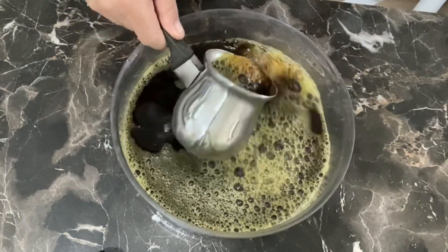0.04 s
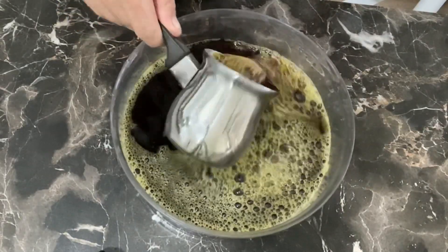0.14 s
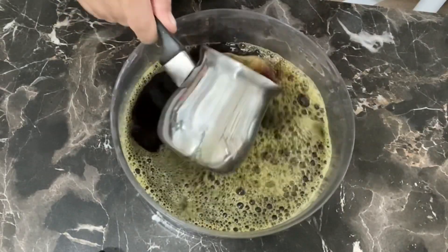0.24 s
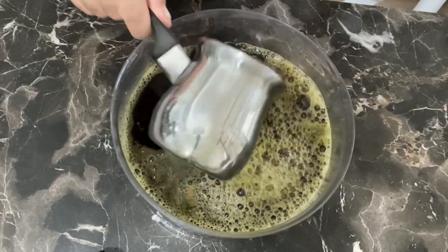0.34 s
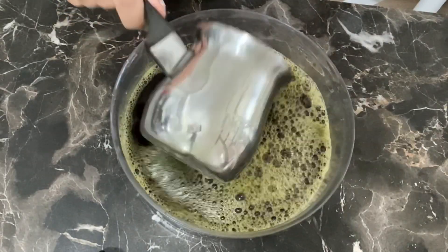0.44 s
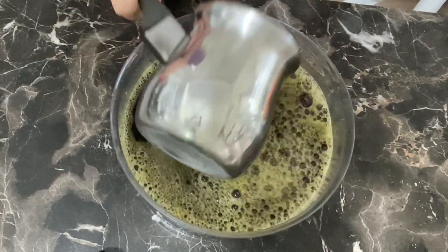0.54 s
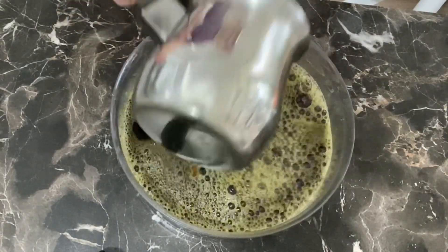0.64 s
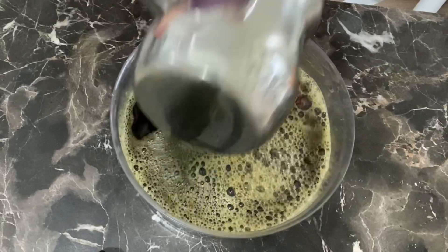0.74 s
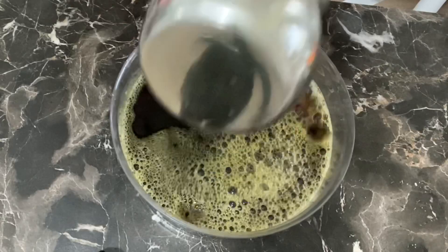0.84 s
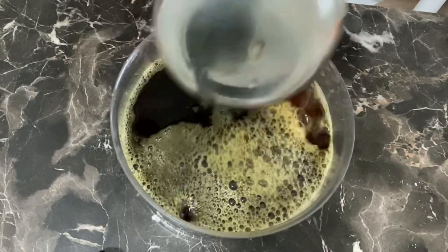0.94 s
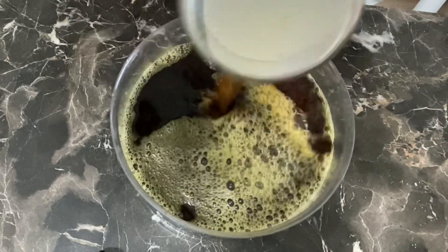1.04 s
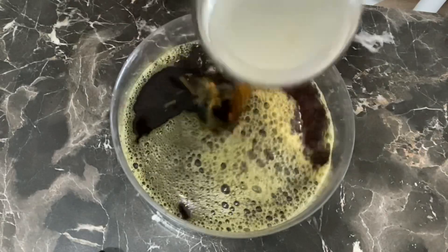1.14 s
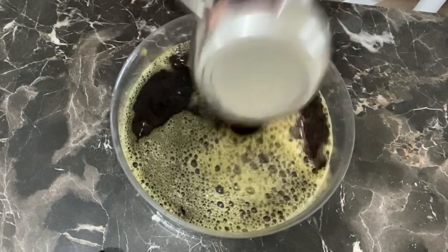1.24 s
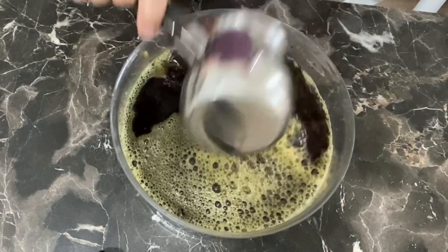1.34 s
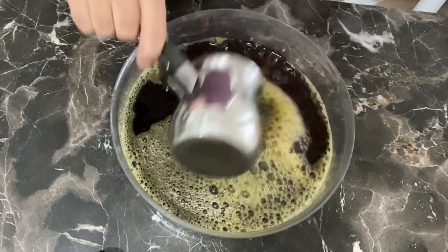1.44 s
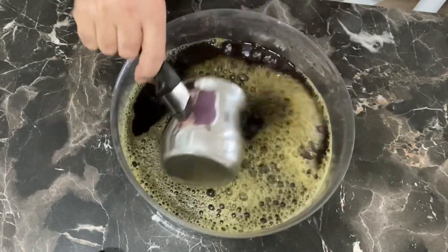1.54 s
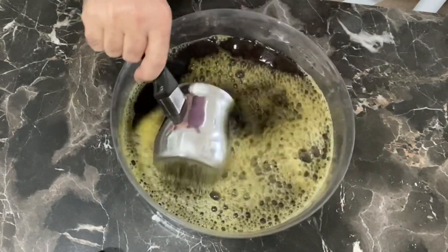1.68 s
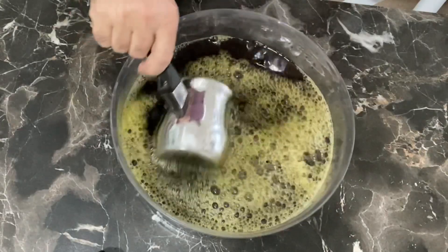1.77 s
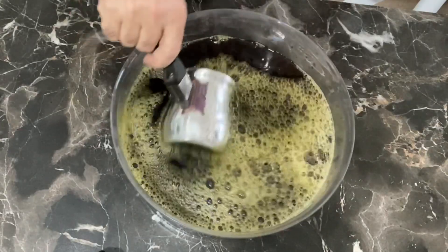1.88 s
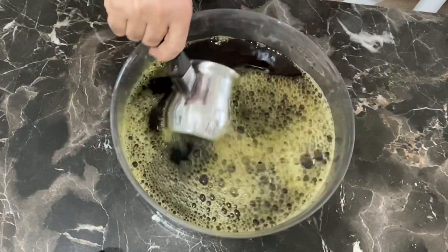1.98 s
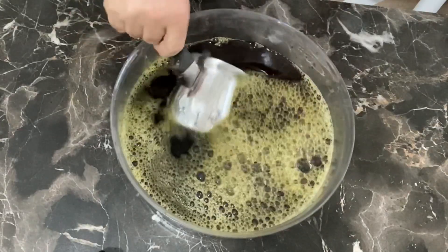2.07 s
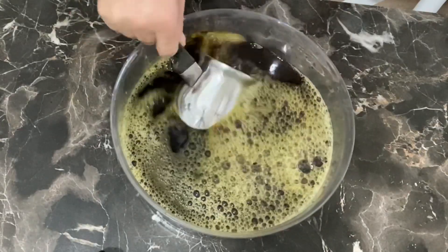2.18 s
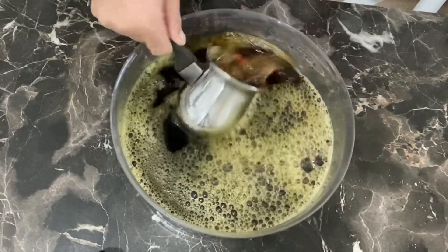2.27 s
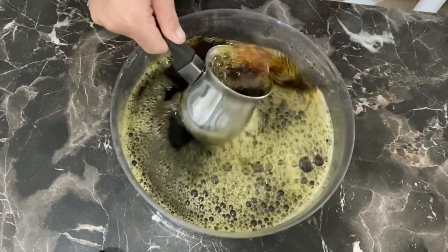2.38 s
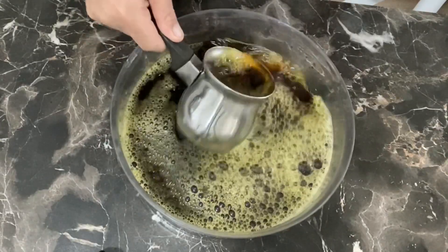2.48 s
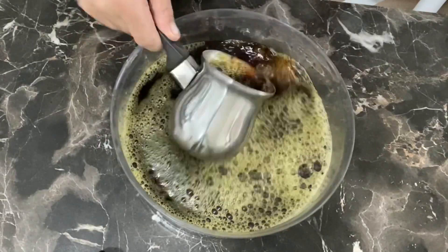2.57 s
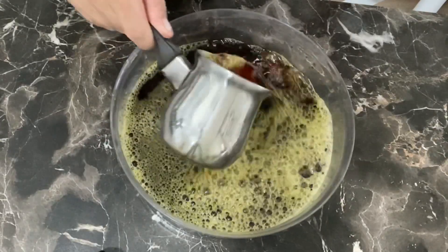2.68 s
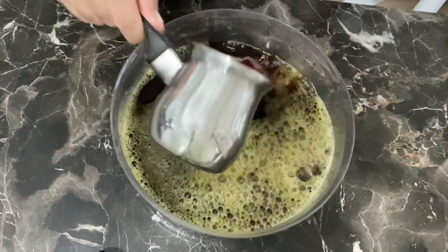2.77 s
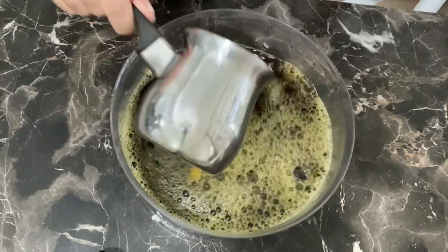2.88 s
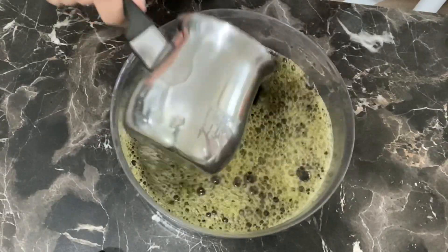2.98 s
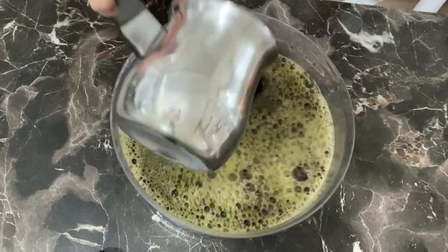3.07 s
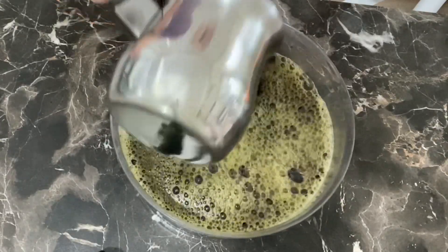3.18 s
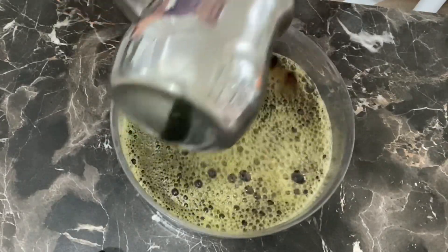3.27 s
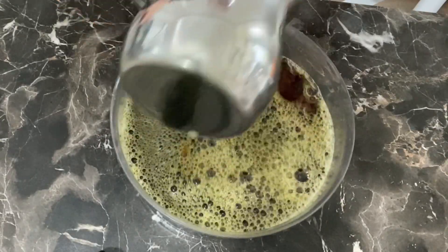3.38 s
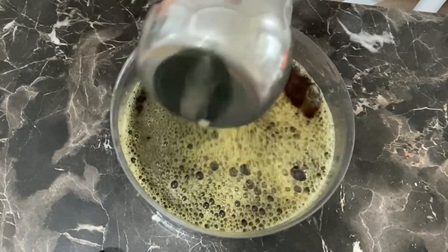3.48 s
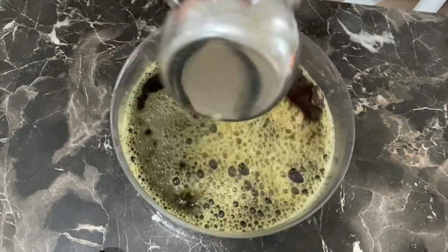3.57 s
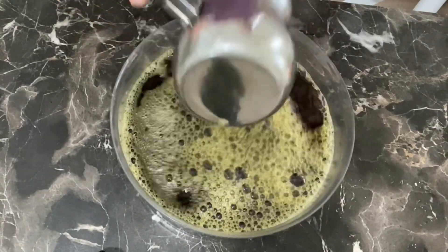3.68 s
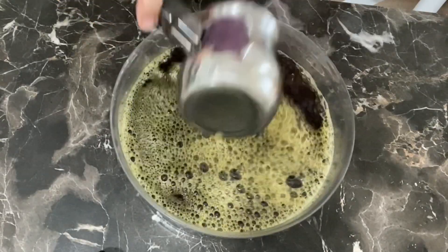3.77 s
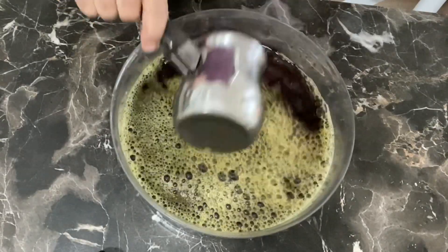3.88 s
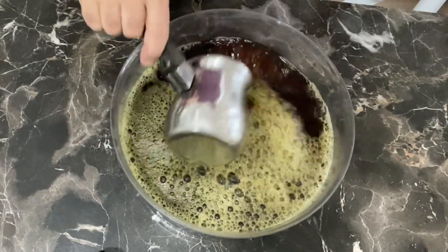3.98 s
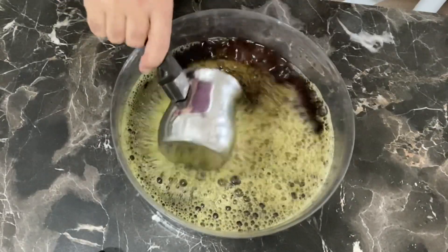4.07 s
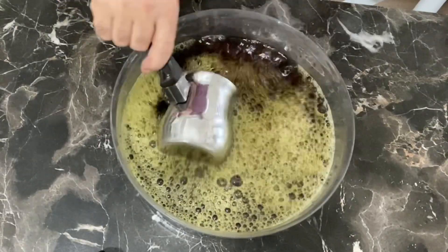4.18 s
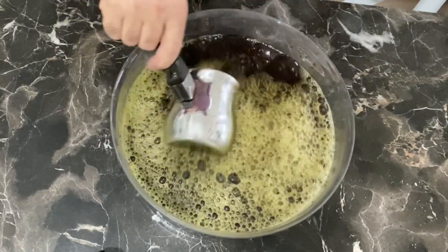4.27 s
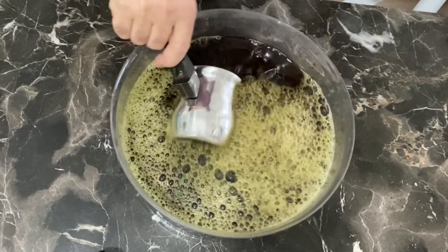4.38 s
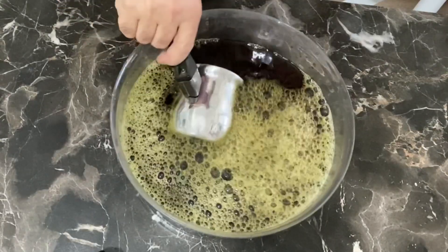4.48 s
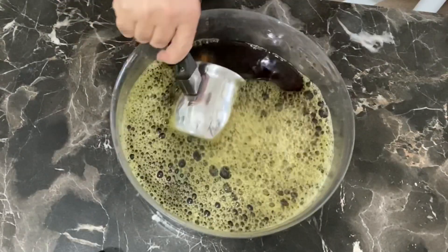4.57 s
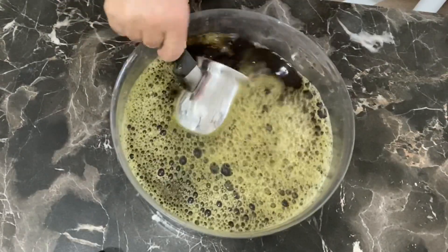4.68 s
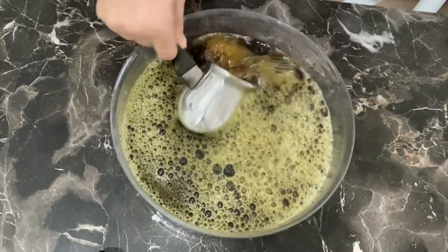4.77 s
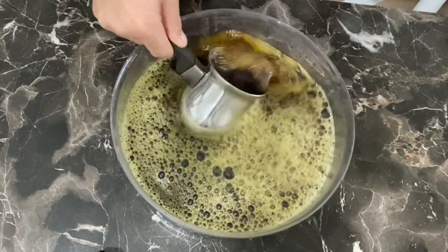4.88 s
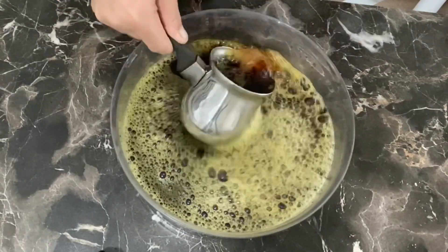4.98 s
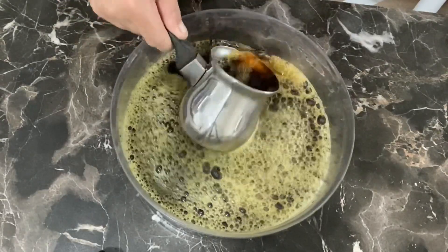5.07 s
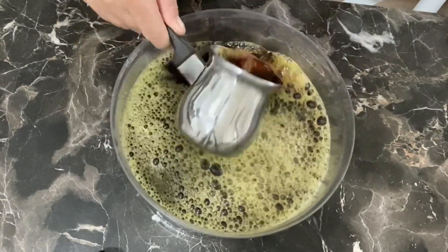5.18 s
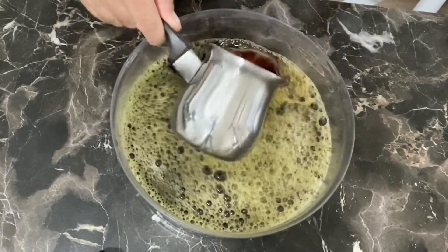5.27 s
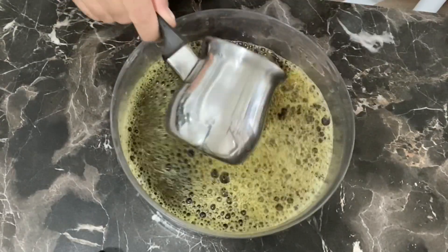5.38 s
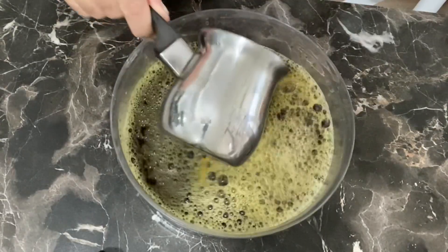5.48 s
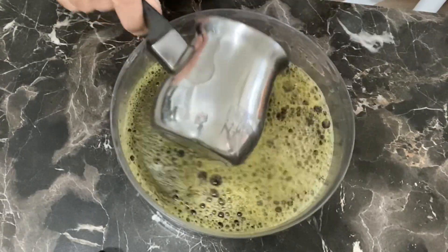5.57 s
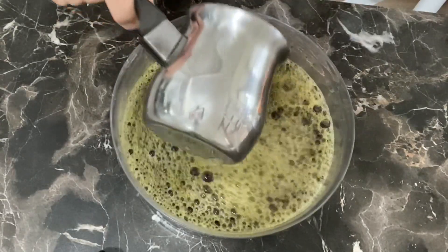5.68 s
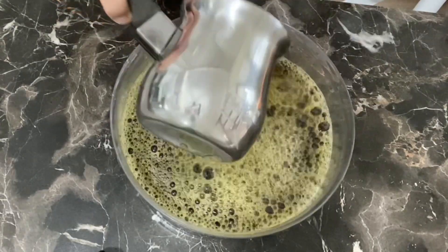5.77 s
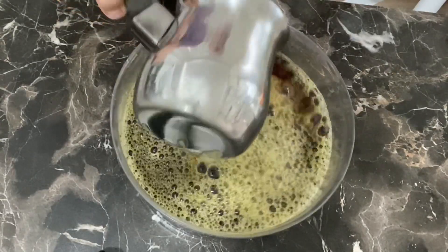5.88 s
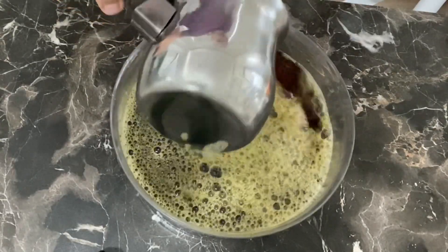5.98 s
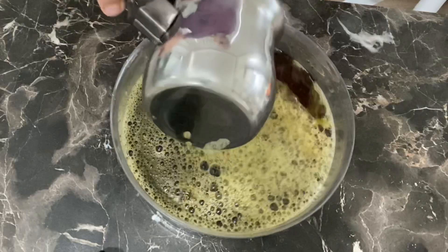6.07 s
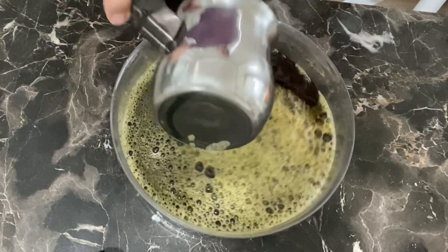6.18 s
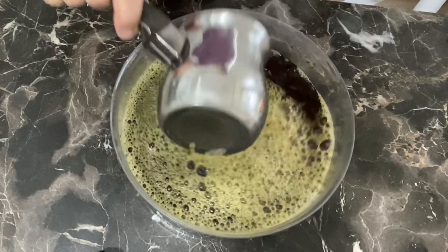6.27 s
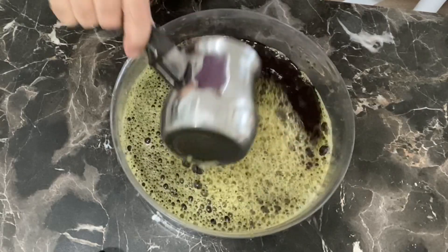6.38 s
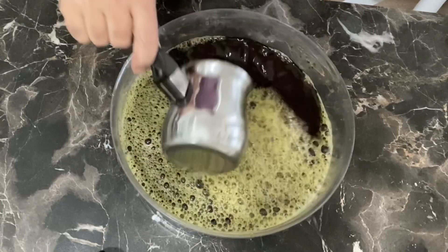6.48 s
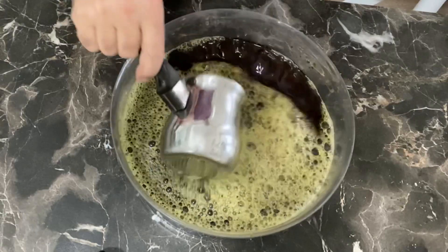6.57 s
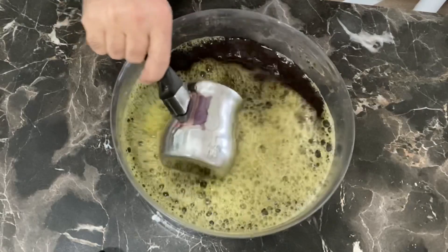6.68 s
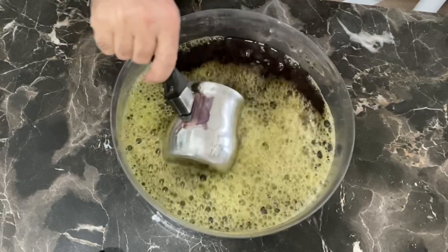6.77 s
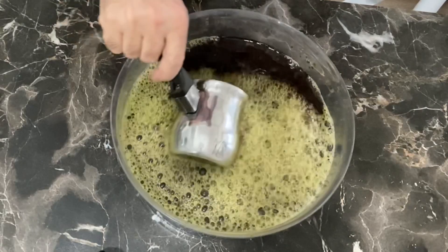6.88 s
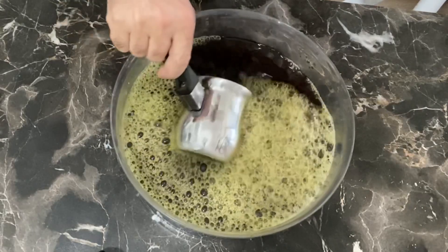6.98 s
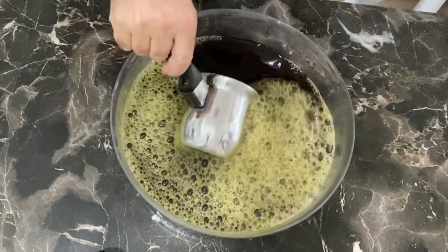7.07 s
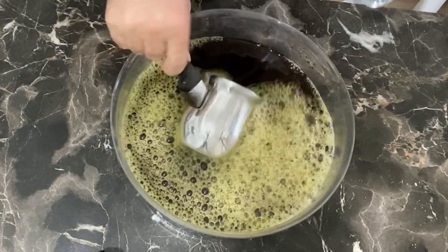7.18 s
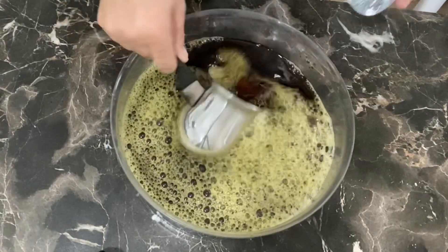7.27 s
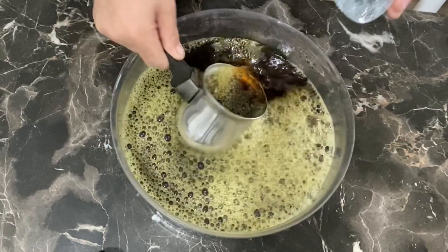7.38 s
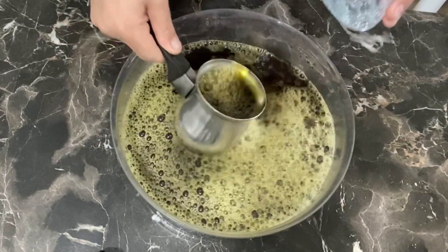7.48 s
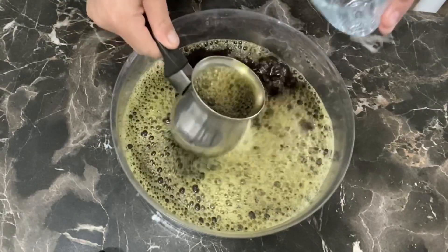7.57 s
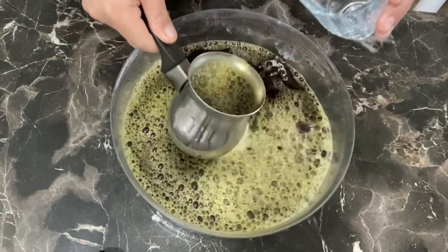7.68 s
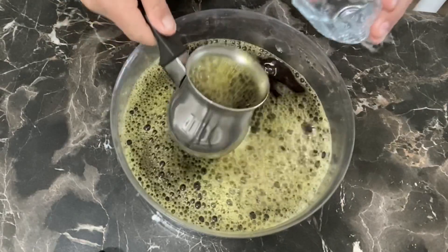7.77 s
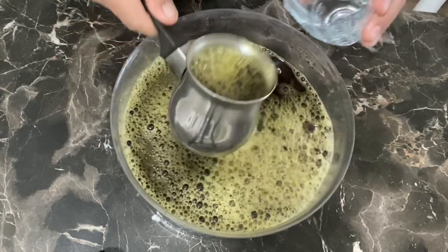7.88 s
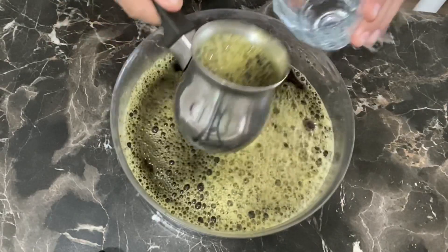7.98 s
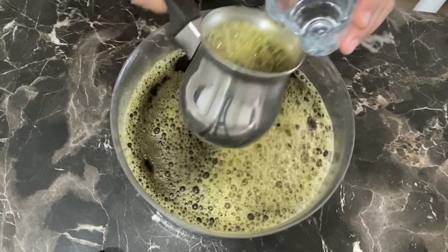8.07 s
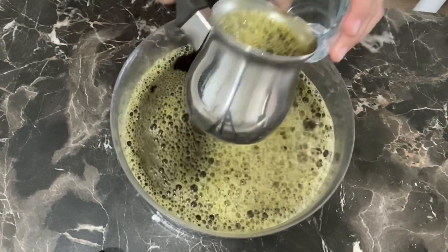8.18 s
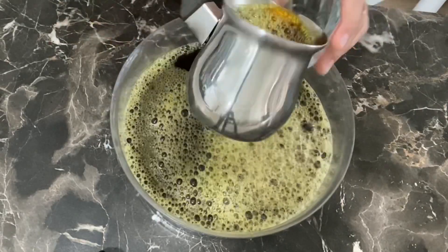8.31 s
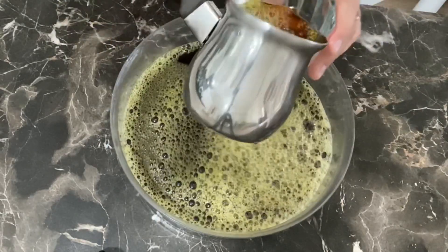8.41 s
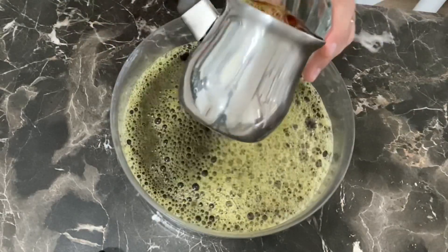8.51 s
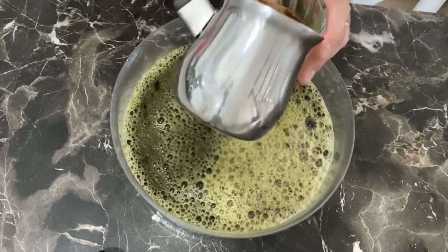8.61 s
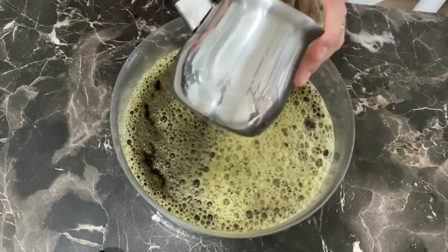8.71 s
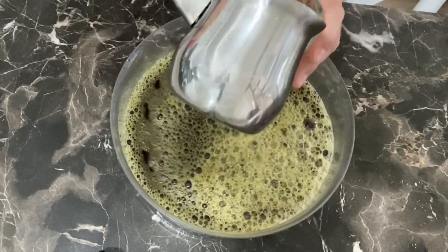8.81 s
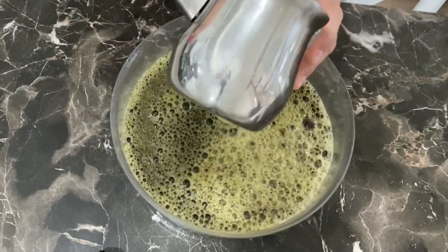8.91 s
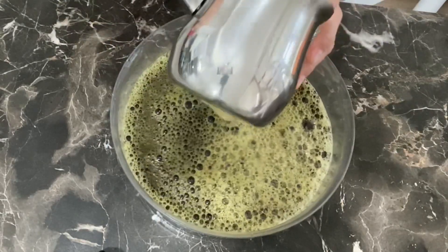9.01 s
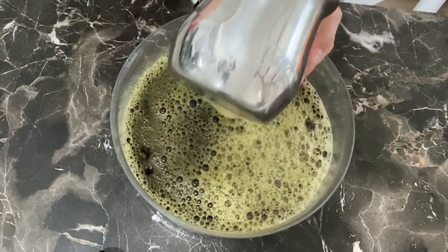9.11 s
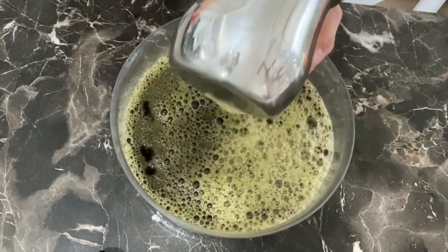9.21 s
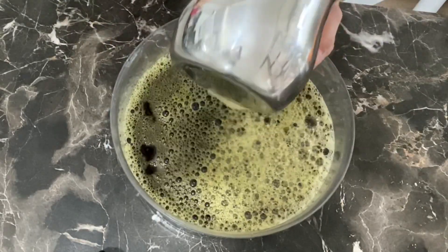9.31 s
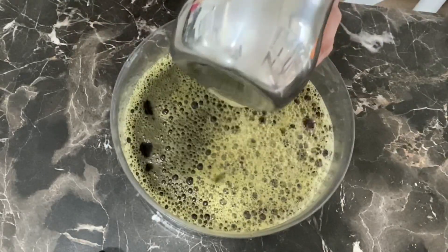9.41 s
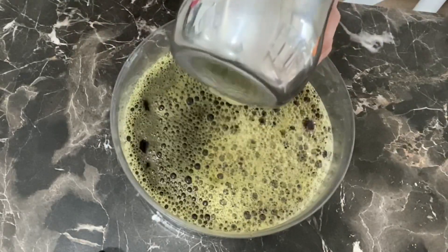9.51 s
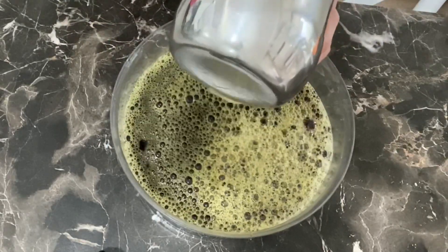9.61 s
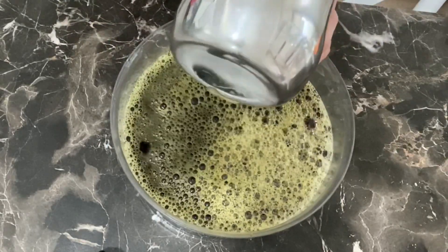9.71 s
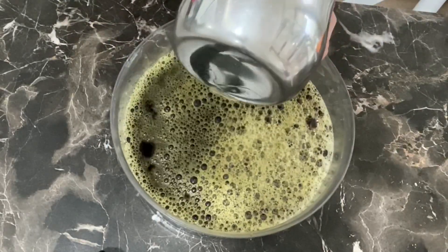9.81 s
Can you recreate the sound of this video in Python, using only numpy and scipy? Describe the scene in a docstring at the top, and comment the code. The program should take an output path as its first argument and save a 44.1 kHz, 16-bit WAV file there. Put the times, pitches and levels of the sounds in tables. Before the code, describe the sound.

A small steel pot pours frothy liquid back into a glass bowl three times with hollow plunges between, then fills a drinking glass in a kitchen.

```python
"""In a hard-walled kitchen, a small steel pot scoops frothy liquid from a glass bowl and pours it back three times.
The pours are crowds of ringing bubbles, with noisy spray, low churning and single plops and drops on top.
After each pour the pot is plunged in mouth first: a noise slap, ringing steel, then gulps of trapped air
as sinking tones. At the end a stream fills a drinking glass, heard as bubbles through moving resonances.
Foam crackle, wet and soft rustles, room echo and still air surround it."""
import sys
import numpy as np
from scipy import signal
from scipy.fft import rfft, irfft, next_fast_len
from scipy.io import wavfile
from scipy.ndimage import uniform_filter1d

SR = 44100
rng = np.random.default_rng(int(sys.argv[2]) if len(sys.argv) > 2 else 0)


def unload_audio(sound):
    """Save the sound as a 16-bit wav file, at the path given as the first command line argument."""
    columns = np.transpose(np.atleast_2d(sound))
    # keep every value between -1 and 1, then stretch to whole-number steps
    steps = np.round(np.clip(columns, -1, 1) * 32767)
    wavfile.write(sys.argv[1], SR, steps.astype(np.int16))


N = 434385
TIME = np.arange(N) / SR  # seconds

# In all tables, t60 is the time a sound takes to fade by 60 dB.
# The three pours back into the bowl. Each row: start, gush, surge and empty times in seconds, gush, surge and
# last flow level in dB, then spray offset and churning offset in dB.
POURS = [(0.216, 0.473, 0.874, 1.239, -44, -39, -42.5, -2.5, -3.5),
         (2.788, 3.003, 4.3, 3.799, -42.5, -37, -43.5, -2, -1),
         (5.339, 5.632, 6.07, 6.368, -41.5, -44.5, -52.5, -3.5, -4.5)]
# Slugs of liquid that land and heave the bowl. Each row: time in seconds, level in dB, half length in seconds.
HEAVES = [(0.465, -42, 0.013), (0.555, -43, 0.017), (3.02, -48, 0.035), (3.63, -43, 0.042),
          (5.64, -42.5, 0.022)]
# The pot's mouth meets the surface. Each row: time in seconds, slap level in dB, slap length in seconds,
# pitch above which it is dull in Hz, ring level in dB, sinking of the ring in octaves, crack level in dB.
SLAPS = [(2.0142, -23.5, 0.0098, 3040, -35.5, 0.0073, -34.5),
         (4.3597, -21.5, 0.0054, 2280, -36.5, 0.15, -27), (4.524, -25.5, 0.011, 2630, -52, 0.1, -31.5),
         (6.996, -20.5, 0.0093, 2400, -33, 0.11, -26.5)]
# Ringing of pot and bowl, damped by the liquid. Each row: pitch in Hz, level in dB.
POT_RINGING = [(264, -4.5), (296, 4), (393, -2), (469, -7), (568, 1), (676, -7.5), (802, -5), (870, -4.5),
               (931, 11), (1081, -11), (1206, -9), (1440, -1), (1855, -4.5), (2010, -4), (2158, -9.5),
               (2275, -9), (3260, -21)]
# Air pockets shut in by the pot, and their rebounds; each opens fast, so its pitch sinks. Each row: time in
# seconds, level in dB, first pitch in Hz, settled pitch in Hz, sinking time in seconds, t60 in seconds.
GULPS = [(1.243, -28, 172, 131, 0.0083, 0.12), (1.31, -29.5, 158.4, 126, 0.0087, 0.13),
         (2.018, -23.5, 1010, 323, 0.0032, 0.07), (2.026, -16, 215, 164.2, 0.004, 0.15),
         (2.063, -19.5, 148, 128.4, 0.01, 0.1), (4.363, -16, 1136, 276, 0.00213, 0.095),
         (4.369, -21, 192, 129, 0.0091, 0.2), (4.394, -19, 150, 126, 0.01, 0.13),
         (4.5277, -16, 1580, 570, 0.0047, 0.031), (4.535, -18, 380, 119, 0.0044, 0.063),
         (4.573, -23, 138, 122, 0.0079, 0.13), (6.9992, -14, 1160, 273, 0.00199, 0.065),
         (7.005, -18.5, 181, 123, 0.0075, 0.043), (7.042, -18, 156, 127, 0.0095, 0.068),
         (7.045, -26, 330, 285, 0.0064, 0.066)]
# Resonances of the filling glass. Each row: time in seconds, air column in Hz, tone of the liquid in Hz.
GLASS_TONES = [(8.6, 900, 927), (8.87, 970, 820), (9.001, 1110, 576), (9.15, 1190, 365), (9.38, 1210, 232),
               (9.55, 1350, 190), (9.72, 1740, 168)]
# The stream into the glass. Each row: time in seconds, flow level in dB.
GLASS_FLOW = [(8.55, -75), (8.77, -63), (8.82, -41.5), (9.12, -41.5), (9.25, -43.5), (9.4, -40.5),
              (9.63, -49.5), (9.85, -41.5)]
# The largest bubbles: a cavity that opens falls in pitch, a bubble that surfaces rises. Each row: time in
# seconds, level in dB, pitch in Hz, t60 in seconds, glide in octaves.
PLOPS = [(0.148, -24.5, 1070, 0.014, -0.7), (0.2135, -24, 1140, 0.025, -2.5),
         (0.263, -29.5, 1175, 0.042, -1.2), (0.278, -28, 710, 0.041, 0.4),
         (0.317, -32.5, 1075, 0.041, -0.7), (0.447, -26, 1160, 0.034, 0.4), (0.489, -27.5, 1050, 0.034, -1),
         (0.523, -24.5, 710, 0.033, -1.2), (0.547, -22.5, 950, 0.02, -1), (0.566, -27, 942, 0.041, 1.8),
         (0.68, -25.5, 1130, 0.019, 1.5), (0.729, -22, 1153, 0.033, -1.2), (0.861, -23, 1090, 0.02, 4),
         (0.914, -19, 1520, 0.019, 0), (0.974, -17.5, 810, 0.02, 0.8), (1.075, -26, 1410, 0.019, -0.27),
         (1.124, -21.5, 2250, 0.026, -0.1), (1.236, -29.5, 685, 0.053, -1), (1.528, -50, 1050, 0.021, -2),
         (1.565, -45.5, 1250, 0.011, 1.5), (1.919, -47, 790, 0.025, -0.5), (1.945, -35.5, 800, 0.03, 1.5),
         (2.738, -38, 1200, 0.066, -1), (2.77, -30, 1113, 0.046, -1.1), (2.818, -35, 1030, 0.037, -1.7),
         (2.923, -27, 1047, 0.038, -0.5), (2.9705, -23.5, 1000, 0.021, 0.5), (2.989, -16, 1030, 0.04, -3),
         (3.139, -28, 720, 0.057, -0.36), (3.17, -24.5, 1360, 0.015, 1), (3.266, -18.5, 1030, 0.017, -1),
         (3.41, -20.5, 1024, 0.025, -0.2), (3.472, -21, 1273, 0.033, 1.7), (3.499, -12, 827, 0.014, -1.2),
         (3.586, -26, 726, 0.039, 0.2), (3.62, -21, 1050, 0.031, 0.8), (3.678, -27.5, 1250, 0.026, 0.2),
         (3.731, -24, 1450, 0.027, 1), (4.945, -42.5, 1030, 0.013, -2), (5.011, -41.5, 990, 0.016, -0.8),
         (5.029, -46, 1270, 0.018, 0.8), (5.098, -33, 1180, 0.014, -0.3), (5.182, -44, 2260, 0.032, 0.058),
         (5.25, -34, 2360, 0.022, 0.5), (5.267, -38, 1060, 0.05, -2.2), (5.305, -39.5, 1070, 0.032, 2.5),
         (5.341, -37, 780, 0.045, -3.5), (5.392, -31, 1170, 0.027, 0.14), (5.432, -32, 720, 0.03, -0.3),
         (5.551, -19, 793, 0.029, -1.5), (5.602, -23.5, 920, 0.021, 0.7), (5.68, -23.5, 1170, 0.018, -0.3),
         (5.725, -32.5, 786, 0.059, -0.7), (5.822, -27.5, 700, 0.032, 0), (5.889, -23.5, 2146, 0.035, -0.3),
         (5.918, -24, 1075, 0.025, -0.4), (6.023, -26, 760, 0.04, 1.4), (6.062, -21, 877, 0.035, 1.2),
         (6.095, -17, 786, 0.016, 1.3), (6.143, -21.5, 1044, 0.021, 1.8), (6.203, -35, 780, 0.026, -1.5),
         (6.34, -30.5, 637, 0.023, -0.8), (6.929, -49.5, 1150, 0.041, -0.7),
         (7.257, -31.5, 503, 0.015, -1.5), (8.595, -44, 2140, 0.013, 1), (8.677, -23.5, 2214, 0.022, -0.9),
         (8.79, -29.5, 2090, 0.019, 4), (8.832, -29, 1040, 0.021, 1.5), (8.874, -24, 838, 0.04, -0.4),
         (8.966, -31.5, 690, 0.05, -2.7), (9.009, -23, 1024, 0.036, 0), (9.098, -22.5, 1175, 0.029, -1.5),
         (9.1, -30, 454, 0.039, 2.5), (9.165, -25, 1140, 0.025, 1), (9.312, -27, 1220, 0.02, 0),
         (9.351, -24.5, 1240, 0.021, 0.8), (9.394, -32, 1300, 0.033, 0), (9.488, -25, 1445, 0.0095, 2.2),
         (9.538, -29.5, 1420, 0.03, -0.8), (9.65, -34, 1300, 0.015, 1), (9.701, -32.5, 1830, 0.021, 0)]
# The sharpest drop impacts. Each row: time in seconds, bubble level in dB, bubble pitch in Hz, smack level in dB.
DROPS = [(0.213, -28.5, 4630, -41.5), (0.449, -36, 5000, -40), (0.71, -26.5, 2630, -33.5),
         (0.828, -33, 3520, -37), (0.843, -11, 3680, -50.5), (0.89, -40, 3520, -45),
         (1.0893, -18, 2430, -35), (1.144, -37, 8140, -34), (1.188, -12.5, 2970, -27),
         (1.333, -40, 8500, -41), (1.493, -40, 8810, -57), (1.708, -53, 8000, -50),
         (2.678, -43, 9000, -57.5), (2.7376, -29, 2300, -49.5), (2.773, -25, 1980, -66),
         (2.922, -30, 6300, -37), (2.971, -24.5, 1440, -50), (2.9886, -18.5, 5840, -27),
         (3.137, -22.5, 4360, -34.5), (3.3144, -46, 9100, -33), (3.429, -22.5, 2490, -26),
         (3.5001, -15, 2760, -21), (3.619, -15.5, 5400, -28), (3.678, -26, 7540, -31.5),
         (3.7397, -24, 4530, -34.5), (3.7891, -23, 7250, -44), (3.8457, -32, 7700, -51),
         (5.099, -41, 7100, -62), (5.267, -24, 6500, -45), (5.35, -30.5, 4900, -44.5),
         (5.507, -27, 8400, -40.5), (5.6174, -21.5, 8300, -39), (5.681, -33, 3250, -41.5),
         (5.7892, -23.5, 6760, -50), (5.855, -33, 6800, -34), (5.868, -35, 2560, -38),
         (5.968, -24, 7750, -42), (6.009, -25.5, 6800, -43), (6.054, -42, 9000, -41),
         (6.205, -33, 7000, -46), (6.272, -31.5, 6630, -54), (8.5036, -27.5, 7550, -60.5),
         (8.5741, -44, 5950, -50.5), (8.596, -38, 5000, -45), (8.64, -41, 4200, -50),
         (8.679, -23.5, 4480, -53), (9.061, -29, 3500, -46), (9.098, -25.5, 3880, -44.5),
         (9.3117, -28, 9400, -50), (9.4879, -28, 7200, -56)]
# Liquid laps round the pot and runs off it. Each row: time in seconds, level in dB, half length in seconds,
# pitch in Hz.
LAPPING = [(0.018, -61.5, 0.067, 2360), (1.957, -46.5, 0.012, 1240), (2.38, -54, 0.031, 1030),
           (2.444, -61.5, 0.044, 3215), (4.96, -66, 0.16, 1047), (5.168, -62.5, 0.2, 3220),
           (6.951, -57, 0.019, 764), (7.463, -68, 0.14, 3590), (7.85, -73.5, 0.075, 1632)]
# A soft rustle as pot and glass are moved. Each row: time in seconds, level in dB, half length in seconds.
RUSTLE = [(6.58, -65, 0.29), (7.48, -63.5, 0.34), (8.2, -65.5, 0.31)]

# Tone colours of the sources and the room tail. Each row: frequency in Hz, filter gain in dB.
BUBBLE_COLOUR = [(250, -21.5), (450, -21.5), (650, -0.5), (1100, 1.5), (1600, -6.5), (2450, -1), (2850, -9),
                 (3500, -6), (5000, -12)]
SPRAY_COLOUR = [(800, -27), (2000, -3), (3800, 6.5), (5500, 0.5), (8500, 0.5), (12500, -1), (14500, 5.5),
                (16500, -28.5)]
CHURN_COLOUR = [(25, 3), (60, -15.5), (110, -0.5), (170, -3), (260, -7.5), (400, -9), (700, -17.5),
                (1500, -36.5)]
SLAP_COLOUR = [(60, -44.5), (200, -15), (500, 2), (900, 7.5), (1500, 0.5), (1750, -1), (2200, 3.5),
               (2800, -8.5), (4200, -6), (5500, -14), (8000, -9.5), (14000, -16)]
TAIL_COLOUR = [(60, -12), (190, 2), (300, 1.5), (800, -1.5), (2200, -1), (4000, -0.5), (8000, -5.5),
               (16000, -11)]
AIR_COLOUR = [(15, -39), (25, 8), (384, -4), (545, -9), (962, -9.5), (2280, -24.5), (8140, -27.5),
              (9320, -26), (10400, -49), (11600, -27.5), (13600, -15), (16000, -63.5)]
# Standing waves of the kitchen. Each row: pitch in Hz, level in dB, t60 in seconds.
ROOM_MODES = [(97, -4, .4), (110, -6, .4), (125, 3.5, .55), (151, -1, .45), (172, 0, .42), (188, -6, .35),
              (258, -3, .35), (296, -6, .3)]
# How long the room echo lasts. Each row: frequency in Hz, t60 in seconds.
ROOM_T60 = [(100, 0.64), (250, 0.57), (630, 0.58), (1650, 0.6), (4400, 0.66), (14000, 0.67)]
# Sound from all sides. Each row: frequency in Hz, likeness of left and right (1 is identical).
LIKENESS = [(60, 0.75), (130, 0.82), (300, 0.34), (450, 0.13), (700, -0.07), (1500, 0.05), (3000, 0.091),
            (15000, 0.24)]
# Left side against right side. Each row: frequency in Hz, gain in dB.
LEFT_SHADE = [(120, -0.5), (300, -1.5), (500, -17), (800, -17), (1100, -5), (1900, -2), (4000, -4),
              (6000, -11), (8500, -2), (14000, 3)]
# Response of the microphone. Each row: frequency in Hz, gain in dB.
MICROPHONE = [(30, -1), (9200, 0), (9900, -8.5), (10500, -17.5), (11100, -2.5), (12000, -1), (16000, -16)]

TRICKLE_DB, SAG_DB = -8, -2.5  # against the gush
TIP_S, SWELL_S, SAG_S, DRAIN_DB_PER_S = 0.097, 0.13, 0.054, 174
FULL_FLOW_DB, SPRAY_GROWTH = -41.5, 1.4  # spray grows faster than the flow
CHURN_LAG_S = 0.035  # the liquid heaves a moment after the stream lands
GURGLE_DB = -8  # against the flow
SLAP_ATTACK_S, POT_T60_S = 0.0012, .19
# the steel wall clanks briefly; its level is against the slap level in the table
CLANK_DB, CLANK_HZ, CLANK_T60_S, CLANK_LAG_S = -4, 2075, 0.022, 0.0008
WAKE_DB, WAKE_T60_S = -22, 0.24  # level against the slap level in the table
# spray is strongest on the bare bottom of the glass
GLASS_WET_S, GLASS_SPRAY_DB, GLASS_SPRAY_FADE_DB_PER_S = 8.62, -47, 9.5
# the boom grows as the liquid deepens, then holds
GLASS_DEEP_S, GLASS_BOOM_DB, GLASS_BOOM_RISE_DB_PER_S = 9.15, -62, 54
FOAM_DB, AIR_DB = -73.5, -66
CUTOFF_HZ = 16300


def from_db(db):
    """Turn decibels into gain."""
    return 10 ** (np.asarray(db) / 20)


def rms_one(x):
    """Scale a sound so that its average strength (rms) is 1."""
    return x / np.sqrt(np.mean(x ** 2) + 1e-20)


def fade_60(t, t60):
    """Die away evenly in dB, losing 60 dB in t60 seconds."""
    return np.exp(-np.log(1000) * t / t60)


def gains(rows):
    """Turn each dB column into a gain over time, silent outside its span."""
    s, *columns = np.transpose(rows)
    return [from_db(np.interp(TIME, s, c, left=-200, right=-200)) for c in columns]


def swells(rows):
    """A gain that rises and falls smoothly round each event."""
    gain = 0
    for s, db, half_s in rows:
        distance = (TIME - s) / half_s
        gain = gain + from_db(db) * np.exp(-np.minimum(distance ** 2, 50))
    return gain


def at_hz(points, hz):
    """Read a table at any frequency, along a logarithmic scale."""
    f, value = np.transpose(points)
    return np.interp(np.log(np.maximum(hz, 1)), np.log(f), value)


def add(track, s, sound):
    """Mix a short sound into a track at time s."""
    i = int(np.clip(s * SR, 0, N - 1))
    track[i:i + len(sound)] += sound[:N - i]


def colour(x, spectrum, size=4096):
    """Filter to a given spectrum without sounding ahead of time (minimum phase)."""
    log_gain = np.log(from_db(at_hz(spectrum, np.fft.rfftfreq(size, 1 / SR))))
    cepstrum = irfft(log_gain)
    one_sided = np.r_[1, np.full(size // 2 - 1, 2), np.zeros(size // 2)]
    response = irfft(np.exp(rfft(cepstrum * one_sided)))
    response = response.reshape((1,) * (x.ndim - 1) + (-1,))
    return signal.oaconvolve(x, response, axes=-1)[..., :x.shape[-1]]


def neutral(x, size=90):
    """Level the broad humps and dips of a spectrum, its fine structure left in."""
    power = uniform_filter1d(np.abs(rfft(x)) ** 2, size)
    correction_db = -10 * np.log10(power / power.mean())
    return colour(x, np.c_[np.fft.rfftfreq(len(x), 1 / SR), correction_db][1:])


def resonate(x, hz, width_hz):
    """One resonance, which passes its own pitch at about gain 1."""
    r = np.exp(-np.pi * width_hz / SR)
    feed = np.array([1, 0, -1]) * (1 - r * r) / 2
    feedback = [1, -2 * r * np.cos(2 * np.pi * hz / SR), r * r]
    return signal.lfilter(feed, feedback, x + 1e-18)


def moving_resonance(x, hz, width_hz):
    """A resonance whose centre follows a curve: shift down, smooth, shift back."""
    turn = np.exp(2j * np.pi * np.cumsum(hz) / SR)
    r = np.exp(-np.pi * width_hz / SR)
    return 2 * np.real(turn * signal.lfilter([(1 - r) ** 2], [1, -2 * r, r * r], x / turn))


def drift(per_s):
    """A smooth random wander with average strength 1."""
    knots = rng.standard_normal(N // 100)
    return rms_one(np.interp(TIME * per_s, np.arange(len(knots)), knots))


def evened(x, size=5000):
    """Hold the strength steady over a window of samples, the grain left in."""
    power = np.abs(uniform_filter1d(x * x, size))
    return x / np.sqrt(power + 1e-3 * np.mean(x * x))


def diffuse(size):
    """Stereo noise from all sides: mostly alike in the bass, nearly unrelated higher up."""
    mid, side = rfft(rng.standard_normal((2, next_fast_len(size, True))))
    alike = np.clip(at_hz(LIKENESS, np.linspace(0, SR / 2, len(mid))), -1, 1)
    both = np.sqrt(1 + alike) * mid + np.sqrt(1 - alike) * side * [[1], [-1]]
    return irfft(both)[:, :size] / np.sqrt(2)


def clicks(per_s, spread_db, clump_db):
    """Clumped random impacts of very unequal size."""
    born = rng.random(N) < per_s * from_db(clump_db * drift(90)) / SR
    strength = from_db(spread_db * np.minimum(rng.exponential(1, N), 5))
    return born * strength * rng.choice([-1, 1], N)


def bubble(hz, t60, glide):
    """A bubble starts within a cycle and rings, gliding by some octaves as it dies."""
    t = np.arange(int(max(t60, .001) * SR) + 2) / SR
    pitch = hz * 2 ** (glide * t / t[-1])
    fade = from_db(-60 * t / t[-1])
    attack = 1 - np.exp(-2 * hz * t)
    return np.sin(2 * np.pi * np.cumsum(pitch) / SR) * fade * attack


def bubble_cloud(start, end, low_hz, high_hz, cycles, spread_db, glide, count):
    """Bubbles of many sizes born at random moments, some rising in pitch and some falling."""
    out = np.zeros(N)
    for when, pitch, size, life, sign, bend in rng.random((count, 6)):
        hz = low_hz * (high_hz / low_hz) ** pitch
        strength = from_db(-spread_db * np.log(size + 0.091)) * np.sqrt(hz) * np.sign(sign - .5)
        one = bubble(hz, cycles * (.5 + life) / hz, glide * (2 * bend - 1))
        add(out, start + when * (end - start), strength * one)
    return rms_one(out)


def flow_db(start, gush, surge, empty, gush_db, surge_db, last_db):
    """Flow of one pour over time: trickle, gush, sag, an optional surge, then the pot runs dry."""
    trickle, sag = gush_db + TRICKLE_DB, gush_db + SAG_DB
    stages = [(start - TIP_S, trickle - 25), (start, trickle), (gush - SWELL_S, trickle), (gush, gush_db),
              (gush + SAG_S, sag), (surge - SWELL_S, sag), (surge, surge_db), (empty, last_db)]
    # a pour that is empty before its surge stays at the sag, then steps to its last level
    level = np.interp(TIME, *np.transpose(stages), left=-200)
    return level - DRAIN_DB_PER_S * np.clip(TIME - empty, 0, 1)


def pours():
    """The stream drags air under, throws spray and churns the liquid in uneven lumps."""
    flow, spraying, heave = 0, 0, swells(HEAVES)
    for *pour, spray_db, churn_db in POURS:
        level = flow_db(*pour)
        flow = flow + from_db(level)
        late_level = np.interp(TIME - CHURN_LAG_S, TIME, level)
        heave = heave + from_db(late_level + churn_db)
        spraying = spraying + from_db(FULL_FLOW_DB + SPRAY_GROWTH * (level - FULL_FLOW_DB) + spray_db)
    cloud = bubble_cloud(0, 7.7, low_hz=447.0, high_hz=3200, cycles=19.8, spread_db=4.8, glide=0.71, count=5500)
    splatter = from_db(-3.5) * rms_one(clicks(per_s=1000, spread_db=10.0, clump_db=6))
    wet = evened(colour(cloud + splatter, BUBBLE_COLOUR)) * flow * from_db(4.5)
    clumps = from_db(3.0 * drift(60) - 2.6)
    gurgle = evened(bubble_cloud(0, 6.7, low_hz=537, high_hz=2430, cycles=22, spread_db=10, glide=1.0, count=600))
    churn = evened(colour(clicks(per_s=300, spread_db=2.0, clump_db=5.5), CHURN_COLOUR))
    droplets = spray(0, 6.7, count=3000)
    return wet * clumps + from_db(GURGLE_DB) * flow * gurgle + droplets * spraying + churn * heave


def spray(start, end, count):
    """Droplets land in bursts: brief noisy spits and tiny ringing bubbles."""
    t = np.arange(SR // 100) / SR
    impacts = np.abs(clicks(per_s=600, spread_db=3.0, clump_db=7.5))
    landing = signal.oaconvolve(impacts, t * np.exp(-t / 0.0004))[:N]
    spits = rms_one(landing * rng.standard_normal(N))
    fizz = bubble_cloud(start, end, low_hz=2000, high_hz=14000, cycles=24, spread_db=5.5, glide=.1, count=count)
    bursts = from_db(4 * np.clip(drift(110), -2, 2))
    return evened(colour((spits + from_db(-3.0) * fizz) * bursts, SPRAY_COLOUR), size=7000)


def plunges():
    """The rim slaps the liquid and the pot rings, sinking in pitch; the air shut inside bounces like a spring."""
    slaps, rest, t = np.zeros(N), np.zeros(N), np.arange(SR // 2) / SR
    for s, db, length, dull_hz, ring_db, sink, crack_db in SLAPS:
        burst = rng.standard_normal(len(t)) * np.exp(-(t / length) ** 2) * (1 - np.exp(-t / SLAP_ATTACK_S))
        dulling = signal.butter(2, dull_hz, fs=SR, output="sos")
        add(slaps, s, from_db(db + 11.0) * signal.sosfilt(dulling, neutral(burst, size=50)))
        crack = resonate(rng.standard_normal(len(t)) * np.exp(-t / 0.001), 3200, 4100)
        add(rest, s, from_db(crack_db) * crack)
        clank = bubble(CLANK_HZ, CLANK_T60_S, glide=0)  # here simply a short dying tone
        add(rest, s + CLANK_LAG_S, from_db(db + CLANK_DB) * clank)
        # the liquid loads the steel, so every ringing tone sinks together
        loaded = np.cumsum(2 ** (-sink * np.minimum(t / POT_T60_S, 1))) / SR
        for (hz, mode_db), chance in zip(POT_RINGING, rng.standard_normal((len(POT_RINGING), 2))):
            swing = np.sin(2 * np.pi * hz * loaded) * np.sign(chance[0]) * fade_60(t, POT_T60_S)
            add(rest, s, from_db(ring_db + mode_db + 0.8 * chance[1]) * swing)
    for s, db, *shape in GULPS:
        add(rest, s, from_db(db) * gulp(*shape))
    bass_cut = signal.butter(2, 55, "high", fs=SR, output="sos")
    return colour(slaps, SLAP_COLOUR) + signal.sosfilt(bass_cut, rest)


def gulp(first_hz, settled_hz, sink_s, t60):
    """A pocket of air swings and sinks to its settled pitch."""
    t = np.arange(SR // 2) / SR
    pitch = settled_hz + (first_hz - settled_hz) * np.exp(-t / sink_s)
    attack = 1 - np.exp(-t / 0.00044)
    return -np.sin(2 * np.pi * np.cumsum(pitch) / SR) * fade_60(t, t60) * attack


def wake():
    """Each plunge drags bubbles under, which gurgle and die away."""
    fading = 0
    for s, db, *_ in SLAPS:
        level = db + WAKE_DB - 60 * np.clip(TIME - s, 0, 2) / WAKE_T60_S
        fading = fading + from_db(level) * np.clip((TIME - s) / .01, 0, 1)
    cloud = bubble_cloud(1.7, 8.6, low_hz=300, high_hz=1710, cycles=13, spread_db=4, glide=1.0, count=1100)
    return fading * evened(cloud)


def filling():
    """A thin stream fills the glass: its air column rises in pitch while the frothy liquid's tone sinks."""
    bubbling, = gains(GLASS_FLOW)
    wet_s = TIME - GLASS_WET_S
    spray_db = GLASS_SPRAY_DB - GLASS_SPRAY_FADE_DB_PER_S * np.maximum(wet_s, 0)
    spraying = np.clip(0.47 + wet_s / 0.19, 0, 1) ** 2 * from_db(spray_db)
    booming = from_db(GLASS_BOOM_DB + GLASS_BOOM_RISE_DB_PER_S * np.minimum(TIME - GLASS_DEEP_S, 0))
    s, air_hz, liquid_hz = np.transpose(GLASS_TONES)
    cloud = bubble_cloud(8.4, 9.85, low_hz=500, high_hz=3630, cycles=15.3, spread_db=1.5, glide=0.5, count=1000)
    patter = rms_one(clicks(per_s=2500, spread_db=8.0, clump_db=3.5))
    stream = evened(cloud) + from_db(-12.5) * patter
    column = evened(moving_resonance(stream, np.interp(TIME, s, air_hz), width_hz=390))
    column = column * from_db(3.2 * drift(55) - 1.2)
    liquid = evened(moving_resonance(patter, np.interp(TIME, s, liquid_hz), width_hz=110))
    direct = evened(colour(stream, [(250, -14), (480, -5), (700, -3.0), (1400, -0.5), (2150, 1.5),
                                    (3000, -5.0), (6000, -6.5)]))
    early = np.interp(TIME, [8.78, 8.93, 9.14], [0, .55, 0])  # the shallow liquid sings along with the bubbles
    muffled = from_db(np.interp(TIME, [9.45, 9.7], [0, -6]))  # rising foam damps the air column
    body = bubbling * (from_db(-4.5) * muffled * column + from_db(-4) * direct + early * liquid)
    return body + booming * liquid + spraying * spray(7.0, 9.85, count=600)


def plops():
    """Large bubbles stand out of the liquid, each with a short wet smack and a smaller companion."""
    out, t = np.zeros(N), np.arange(SR // 20) / SR
    noises = rng.standard_normal((len(PLOPS), len(t)))
    ratios = rng.uniform(1.4, 2.5, len(PLOPS))
    for (s, db, hz, t60, glide), noise, ratio in zip(PLOPS, noises, ratios):
        add(out, s, from_db(db + .5) * bubble(hz, t60, glide))
        add(out, s + 0.00097, from_db(db - 16.5) * bubble(hz * ratio, t60 / ratio, glide))
        add(out, s, from_db(db - 1.0) * resonate(noise * np.exp(-t / 0.0018), 2100, 930))
    return out


def drops():
    """Drops smack the surface, spit round their pitch and set a tiny bubble ringing."""
    out, t = np.zeros(N), np.arange(SR // 50) / SR
    for (s, db, hz, smack_db), noise in zip(DROPS, rng.standard_normal((len(DROPS), 2, len(t)))):
        smack = noise[0] * t / 0.00038 * np.exp(-t / 0.00086)
        add(out, s, from_db(smack_db + 12.5) * resonate(smack, 10000, 7800))
        spit = noise[1] * (1 - np.exp(-t / 0.0022)) * np.exp(-t / 0.00095)
        add(out, s, from_db(db + 5.5) * resonate(spit, hz, hz))
        add(out, s + 0.00026, from_db(db + 8.5) * bubble(hz, 10 / hz, glide=0.049))
    return out


def lapping():
    """Soft wet rustles as the pot moves through the liquid, each round its own pitch."""
    grain = clicks(per_s=1100, spread_db=6.0, clump_db=7.5)
    out = np.zeros(N)
    for *row, hz in LAPPING:
        pitched = resonate(resonate(grain, hz, 0.88 * hz), hz, 0.88 * hz)
        out = out + swells([row]) * evened(pitched)
    return out


def foam():
    """The froth on the liquid crackles faintly as its bubbles burst."""
    bursting = clicks(per_s=510, spread_db=4.5, clump_db=1.0)
    crackle = colour(bursting, [(1000, -20.0), (2500, 4.0), (5000, 0.0), (8000, 3.0), (14000, 3.5)])
    return from_db(FOAM_DB) * rms_one(crackle)


def handling_rustle():
    """Moving the pot and glass gives soft swells of uneven low noise."""
    noise = colour(diffuse(N), [(150, -1.0), (290, -7.5), (395, 9.0), (650, -2), (1600, -8.5), (5000, -23)])
    return swells(RUSTLE) * rms_one(noise) * from_db(2.2 * drift(20))


def still_air():
    """The quiet kitchen is a faint steady noise from all sides."""
    return from_db(AIR_DB) * rms_one(colour(diffuse(N), AIR_COLOUR))


def kitchen(x, tail_db):
    """Hard walls return an echo tail that fades at its own speed in each band, and a few low standing waves."""
    size = SR * 2 // 3
    t, hz, noise, tail = np.arange(size) / SR, np.fft.rfftfreq(size, 1 / SR), rfft(diffuse(size)), 0
    centres, t60s = np.transpose(ROOM_T60)
    for t60, one_band in zip(t60s, np.eye(len(t60s))):
        share = at_hz(np.c_[centres, one_band], hz)  # overlapping bands that add up to one
        tail = tail + irfft(noise * share, size) * fade_60(t, t60)
    # bowl and counter reflect first
    tail = tail * (1 - np.exp(-t / 0.00089)) * (1 + 8.1 * np.exp(-t / 0.0039))
    tail = np.array([neutral(side) for side in tail])
    tail = colour(tail / np.sqrt(np.sum(tail[0] ** 2)), TAIL_COLOUR)
    standing = 0
    for mode_hz, db, t60 in ROOM_MODES:
        standing = standing + from_db(db + 5.0) * resonate(x, mode_hz, np.log(1000) / np.pi / t60)
    return from_db(tail_db) * signal.oaconvolve(x[None], tail, axes=-1)[:, :N] + standing


def placed(x, pan_db, lag_s, shade):
    """The source lies to the right: the left side hears it later and more or less shaded."""
    size = next_fast_len(N + 100, True)
    delay = np.exp(-2j * np.pi * np.fft.rfftfreq(size, 1 / SR) * lag_s)
    late = irfft(rfft(x, size) * delay, size)[:N]
    left = colour(late, np.array(LEFT_SHADE) * [1, shade]) * from_db(pan_db / 2)
    return np.array([left, x * from_db(-pan_db / 2)])


def scene():
    """Bowl and glass on the counter, in the still air of the kitchen."""
    bowl = pours() + plops() + drops() + lapping() + foam()
    pot = plunges() + wake()
    glass = filling()
    direct = placed(bowl, pan_db=0.4, lag_s=0.0001446, shade=0.82)
    direct = direct + placed(pot, pan_db=3.5, lag_s=0.00018, shade=1.0)
    direct = direct + placed(glass, pan_db=-1.0, lag_s=0.00015, shade=1.0)
    return direct + kitchen(bowl + pot + glass, tail_db=0.5) + handling_rustle() + still_air()


def record(dry):
    """The microphone sheds the deepest bass and its ports put a notch in the treble; the top is cut."""
    bass_cut = signal.butter(4, 36, "high", fs=SR, output="sos")
    lean = signal.sosfilt(bass_cut, colour(dry, MICROPHONE))
    top_cut = signal.ellip(10, .2, 80, CUTOFF_HZ, fs=SR, output="sos")
    return signal.sosfilt(top_cut, lean)


dry = scene()
out = record(dry)
unload_audio(out)
```